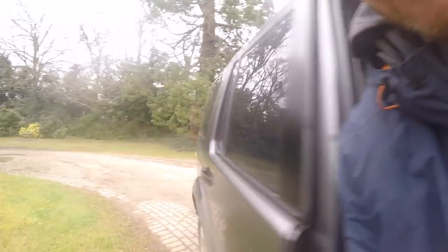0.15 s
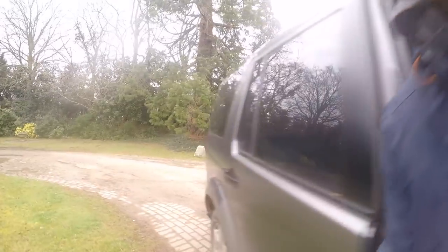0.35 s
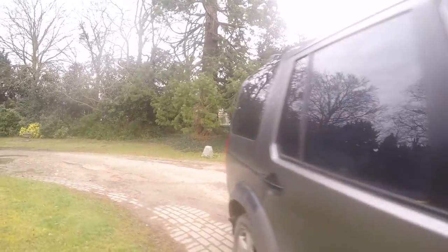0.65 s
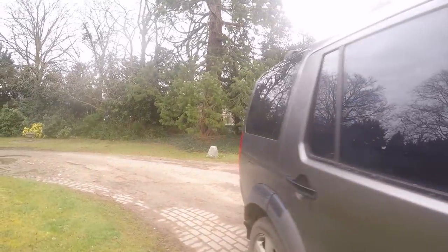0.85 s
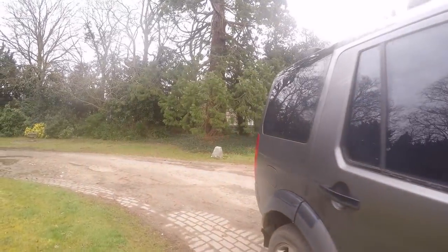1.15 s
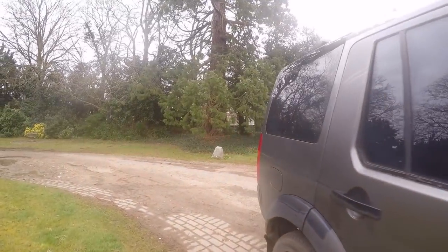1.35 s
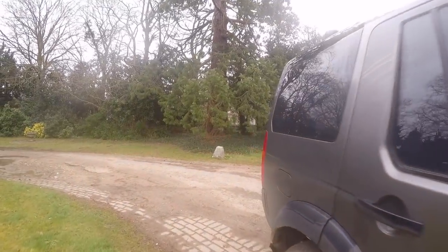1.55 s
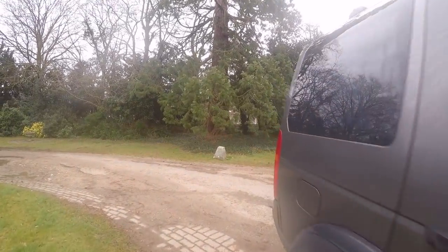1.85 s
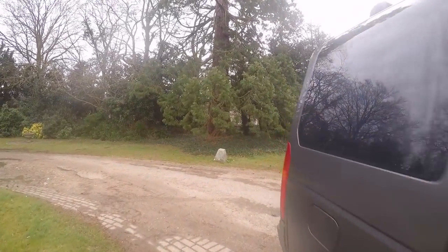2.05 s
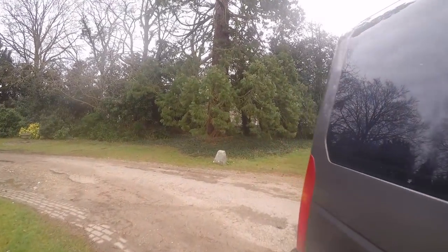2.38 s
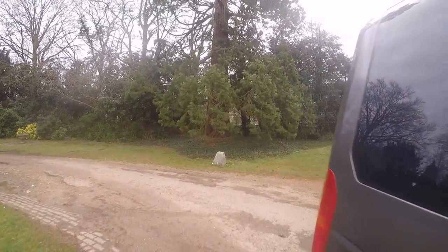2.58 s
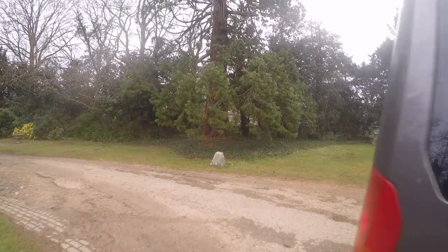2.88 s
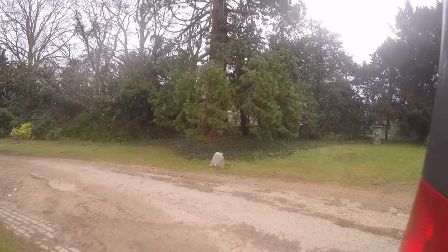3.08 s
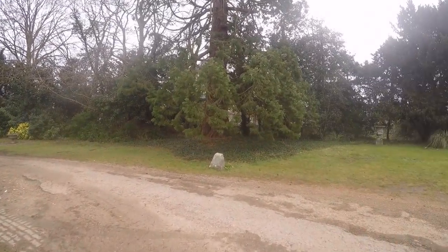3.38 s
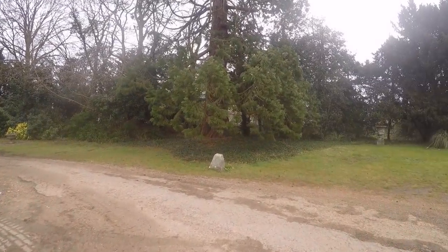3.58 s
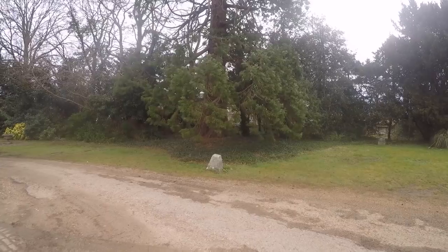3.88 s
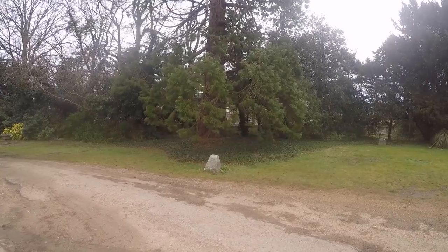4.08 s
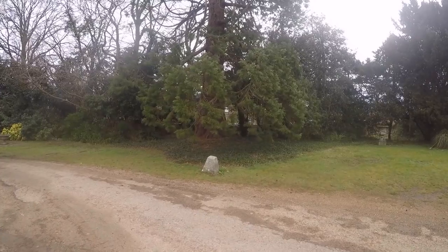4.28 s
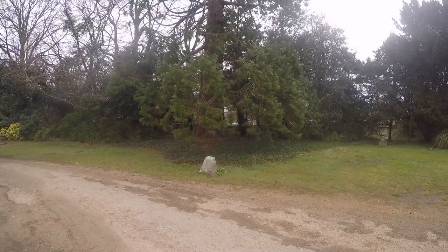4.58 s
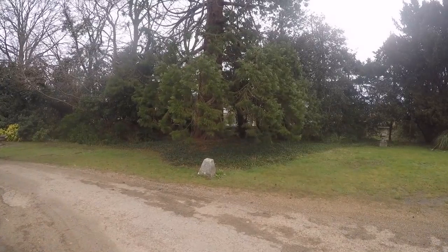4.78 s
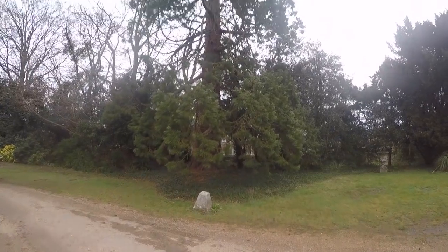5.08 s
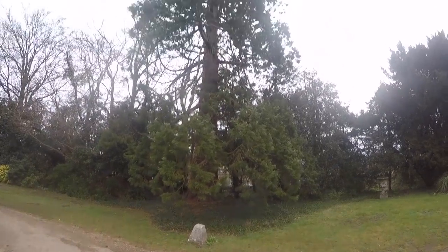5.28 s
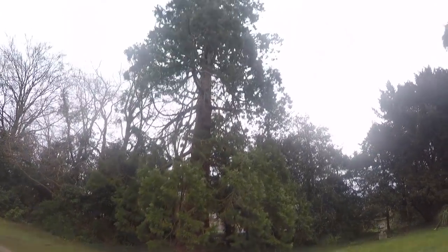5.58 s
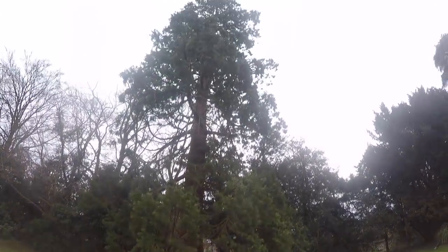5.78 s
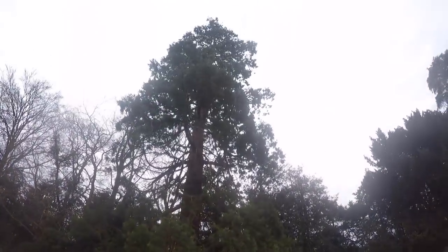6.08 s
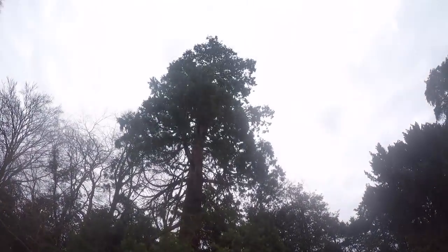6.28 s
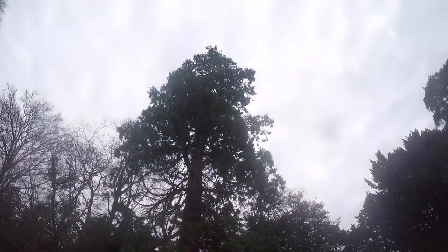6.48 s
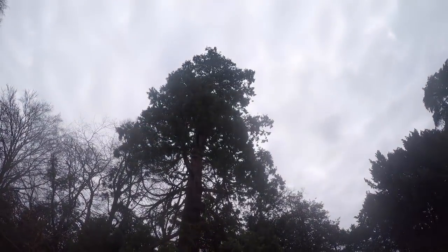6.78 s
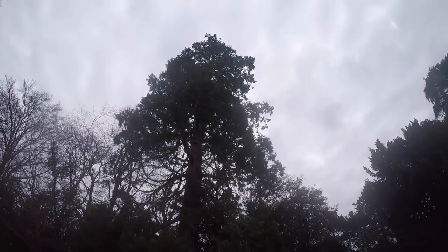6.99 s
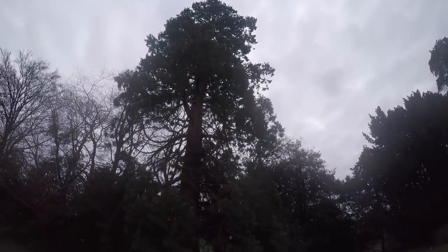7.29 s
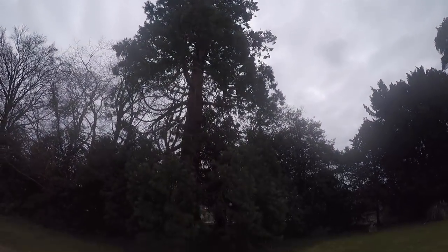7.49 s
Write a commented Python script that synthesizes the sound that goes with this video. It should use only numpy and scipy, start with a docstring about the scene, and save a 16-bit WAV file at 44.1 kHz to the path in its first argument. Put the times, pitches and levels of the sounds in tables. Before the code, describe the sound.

A single-channel outdoor scene beside a car among trees, with faint uneven low rumble and soft distant hiss throughout. From 0 to 0.7 s a jacket rustles close by in tiny catches, with dull handling bumps and light ticks; the rubbing fades until about 2.5 s. Thin bird whistles at 0.25-0.9 s lead into chips and buzzy trills until 1.5 s, blurred by the trees. At about 2.3 s a car door slams very close: a short boxy thud, crisp steel latch clacks and a quick fading rocking in the seal. The background then dips. A near bird makes two sharp falling calls at 3.1 and 3.35 s, the second louder, with a short echo. At 4.6 s comes a small hollow knock with a brief rattle. Distant birds whistle from 5.35 to 6.6 s, then chip and trill rapidly from 6.8 s to the end.

```python
"""A jacket rustles at first, as friction noise broken into tiny catches, amid ticks and soft bumps.
Whistles, chips and trills, frequency-modulated sines, come from trees that echo as decaying noise.
At 2.3 s a car door slams close by: damped modes, cabin noise and latch clacks; a near bird then calls.
A short hollow knock, a set of damped modes with a rattling tail, sounds at 4.6 s.
A faint outdoor rumble and hiss, two bands of filtered noise of uneven level, last throughout."""
import sys
import numpy as np
from scipy import signal
from scipy.fft import rfft, irfft
from scipy.io import wavfile

SR = 44100
rng = np.random.default_rng(int(sys.argv[2]) if len(sys.argv) > 2 else 0)


def inscribe(sig):
    """Save sig as 16-bit PCM at rate SR to the path in sys.argv[1].

    A 1-D sig is mono; a 2-D sig holds one channel per row.
    Samples are clipped to [-1, 1] before scaling.
    """
    pcm = np.round(np.clip(np.atleast_2d(sig).T, -1, 1) * 32767)
    wavfile.write(sys.argv[1], SR, pcm.astype(np.int16))


N = 337273
T = np.arange(N) / SR  # time axis, s

# door meeting seal, latch and frame: start_s, thud_level_db, latch_clack_level_db
DOOR_IMPACTS = [(2.2577, -42.5, -25.5), (2.264, -14.5, -25), (2.2719, -15.5, -23.5), (2.275, -16, -16.5),
                (2.282, -11.5, -29.5), (2.3011, -26.5, -27.5), (2.309, -14.5, -37)]
# resonances of door skin and cabin: pitch_hz, relative_level_db, t60_s
DOOR_RESONANCES = [(64.3, -11.5, 0.33), (98.3, -22, 0.43), (152.3, -12.5, 0.22), (193.2, -6, 0.28),
                   (221, -3, 0.22), (261.6, 2.5, 0.12), (288, -6, 0.15), (322.6, 1.5, 0.099),
                   (349, -9, 0.22), (387, -2.5, 0.15), (432, -21.5, 0.27), (594, -19, 0.08),
                   (686, -15, 0.086), (840, -20, .1)]
# spectrum of the steel latch: frequency_hz, relative_level_db
LATCH_SPECTRUM = [(320, -33), (550, -10), (727, 8), (1070, -21), (1380, -5.5), (2130, -7), (2350, -4),
                  (3190, -11), (3720, -10), (4850, -13.5), (5280, -7), (6330, -11.5), (9750, -20.5),
                  (15500, -49)]
# spectrum of the air in the cabin: frequency_hz, relative_level_db
CABIN_SPECTRUM = [(35, -12.5), (65, -11.5), (100, -4.5), (150, 3.5), (230, 3.5), (320, -4), (400, -9.5),
                  (470, -12.5), (560, -39), (700, -27), (1200, -49.5)]
# the clacks are brightest while the latch snaps shut
LATCH_S, LATCH_SPAN_S, LATCH_BRIGHT_HZ, SEAL_BRIGHT_HZ = 2.288, 0.014, 17740, 5500
# then the door rocks in its seal, weaker each time; the losses are per rebound
ROCK_S, ROCK_PERIOD_S = 2.327, 0.0172
ROCK_THUD_DB, ROCK_CLACK_DB, THUD_LOSS_DB, CLACK_LOSS_DB = -22.5, -37, 2, 9.5

KNOCK_S = 4.637
# resonances of the hollow knock: pitch_hz, level_db, t60_s, delay_s
KNOCK_RESONANCES = [(410, -34.5, 0.046, 0.0031), (754, -18.5, 0.025, 0.00036), (1484, -21.5, 0.027, .0035),
                    (1690, -24, 0.024, .0035), (2104, -26.5, 0.032, .005), (3180, -15.5, 0.0067, .003),
                    (4310, -32, 0.017, 0.0039)]
# spectrum of the knock's rattling aftersound: frequency_hz, relative_level_db
KNOCK_RATTLE_SPECTRUM = [(350, -25), (750, 6), (1100, -7), (1500, 7.5), (2150, -7), (2550, -32),
                         (3200, -16), (4400, -27), (5000, -38)]
# small sharp ticks: start_s, centre_hz, level_db, t60_s
SHARP_TICKS = [(.257, 865, -43, 0.033), (0.739, 1843, -41.5, 0.025), (0.742, 3600, -52, 0.013),
               (.818, 8900, -41.5, .015), (1.782, 3150, -51.5, 0.034), (2.018, 3600, -46, 0.057),
               (2.023, 2817, -47, 0.024), (3.862, 3000, -50.5, 0.071)]
# soft bumps of handling: start_s, level_db
HANDLING_BUMPS = [(0.012, -30), (.048, -26.5), (.268, -34), (0.403, -32.5), (0.433, -34)]

# falling calls of the nearest bird: start_s, high_part_s, low_part_s, start_hz, high_hz, jump_hz, low_hz,
# high_level_db, low_level_db, warble_decay_s, relative_echo_db
NEAR_CALLS = [(3.107, .025, .11, 5980, 5300, 30.5, 3276, -33, -39.5, 0.039, -4.5),
              (3.348, 0.032, 0.075, 5290, 5130, 653, 3453, -22.5, -35, 0.018, -10.5)]
# a call sags on its high note while it swells, then breaks, jumps down and warbles on to the low note
SWELL_DB, SWELL_S, BREAK_S, LOW_FADE_DB_PER_S = 17.5, 0.037, 0.0025, 51
JUMP_S, DROP_S, WARBLE_HZ, WARBLE_DEPTH_HZ = 0.0059, 0.025, 57, 520

# thin whistles in the trees: start_s, length_s, start_hz, end_hz, relative_level_db, nominal_quaver_depth_hz
TREE_WHISTLES = [(.252, 0.084, 3270, 3035, -44.5, 200), (0.394, 0.099, 3200, 2885, -47.5, 185),
                 (0.533, 0.035, 2970, 3040, -50, 185), (0.737, 0.16, 6344, 6100, -47.5, 120),
                 (.759, 0.139, 8350, 8280, -58.5, 160), (2.942, 0.043, 7710, 7820, -60.5, 40),
                 (5.346, 0.048, 3420, 3080, -60.5, 45), (5.394, 0.034, 3046, 3270, -49.5, 45),
                 (5.567, 0.055, 3750, 3870, -53.5, 45), (5.611, 0.0594, 4156, 4040, -40.5, 60),
                 (5.664, 0.14, 4163, 4253, -45, 148.6), (5.821, 0.26, 3648, 3530, -45.5, 45),
                 (6.297, .29, 8080, 8210, -54.5, 110), (6.578, .06, 8460, 8750, -66, 80)]
# quick chips: start_s, start_hz, end_hz, relative_level_db
BIRD_CHIPS = [(1.078, 3150, 2620, -55.5), (1.239, 4040, 2570, -47), (3.323, 5050, 6350, -46),
              (6.806, 4310, 3340, -48), (6.835, 3790, 4310, -41.5), (6.853, 2930, 3400, -51)]
CHIP_S = 0.014
# buzzy syllables of the trilling birds: start_s, start_hz, end_hz, relative_level_db
TRILL_SYLLABLES = [(0.884, 5900, 5700, -56.5), (.975, 5890, 6900, -48), (1.029, 6080, 5920, -42),
                   (1.194, 4960, 4040, -41), (1.262, 4270, 4390, -48.5), (1.405, 4370, 4130, -58),
                   (6.904, 4500, 4620, -45.5), (6.97, 5110, 5100, -47.5), (7.052, 4970, 4610, -48),
                   (7.159, 4500, 4500, -47.5), (7.261, 4270, 4120, -47.5), (7.359, 4470, 4114, -45.5),
                   (7.555, 3086, 3810, -45), (7.584, 3884, 4110, -40)]
# syllables are equally long, and the trill is wider the higher it is sung (nominal depths)
TRILL_S, TRILL_NARROW_HZ, TRILL_WIDE_HZ = 0.064, 110, 824
WIDEN_FROM_HZ, WIDEN_TO_HZ = 4100, 4910

# spectrum of rubbed cloth: frequency_hz, relative_level_db
CLOTH_SPECTRUM = [(410, -35.5), (700, -8), (940, -16.5), (1060, -29.5), (1780, -15), (2940, -12),
                  (6690, -8.5), (13500, -33), (15000, -30.5)]
# scrapes of the jacket: middle_s, half_length_s, level_db
JACKET_SCRAPES = [(0.26, 0.064, -54.5), (0.378, 0.039, -56), (0.68, 0.031, -76), (1.323, 0.092, -62.5),
                  (1.64, 0.045, -66.5), (2.188, 0.062, -72)]
# between scrapes the cloth keeps sliding, ever more softly, and stops as the door shuts
SLIDE_DB, SLIDE_FADE_DB_PER_S, SLIDE_END_S = -61.5, 4, 2.5
# a hollow scuff leads into the first scrape
SCUFF_S, SCUFF_HALF_S, SCUFF_HZ, SCUFF_DB = 0.24, 0.08, 1830, -53.5

# course of the outdoor background, before a fixed trim: time_s, hiss_level_db, rumble_level_db
BACKGROUND_LEVEL = [(0.0, -56, -46), (0.4, -58, -45), (0.68, -59, -49.5), (1.28, -58.5, -48.5),
                    (2.06, -64, -53), (2.32, -60, -50.5), (2.58, -70.5, -60.5), (2.85, -71.5, -63.5),
                    (3.17, -63.5, -54), (3.34, -58.5, -47.5), (3.51, -57.5, -46.5), (4.96, -66, -56.5),
                    (5.62, -62.5, -53.5), (5.88, -56, -49), (6.71, -62, -52.5), (7.2, -57.5, -50),
                    (7.65, -59.5, -51)]
# spectrum of the low rumble: frequency_hz, relative_level_db
RUMBLE_SPECTRUM = [(15, -37), (25, -9.5), (65, -0.5), (208, -4.5), (247, -8), (300, -9.5), (346, -15),
                   (410, -15), (443, -21.5), (498, -26), (560, -43), (730, -69), (1230, -120)]
# spectrum of the distant hiss: frequency_hz, relative_level_db
HISS_SPECTRUM = [(280, -43.5), (480, -4.5), (546, -18), (631, -8), (688, -5), (750, -1), (931, -2.5),
                 (1110, -10), (1210, -3), (1480, -3.5), (3310, -21.5), (6700, -21.5), (7960, -28),
                 (9190, -26.5), (15000, -47.5)]
TOP_HZ = 15300  # upper band limit of the whole sound


def door():
    """Impact excitation: each blow rings the panel through the rubber seal and clacks the steel latch."""
    panel = sum(ring(hz, db, t60) for hz, db, t60 in DOOR_RESONANCES)
    push = T[:SR] * np.exp(-T[:SR] / 0.0005)  # the seal softens the contact
    panel = signal.fftconvolve(panel, push / push.sum())[:SR]
    thuds, clacks = np.zeros(N), np.zeros(N)
    for s, thud_db, clack_db in DOOR_IMPACTS + rocking():
        # the air inside takes a moment to fill
        cabin = noise(CABIN_SPECTRUM, size=SR) * fade(0.25) * (1 - fade(0.008)) ** 2
        add(thuds, s, undb(thud_db) * (panel + undb(-8.5) * cabin))
        # a hard crack, then the lock parts jangle
        crack_and_jangle = fade(0.032) + undb(-19.5) * fade(0.14)
        clack = noise(LATCH_SPECTRUM, size=SR) * crack_and_jangle * (1 - fade(0.0016))
        snap = np.exp(-((s - LATCH_S) / LATCH_SPAN_S) ** 2)
        bright_hz = SEAL_BRIGHT_HZ + (LATCH_BRIGHT_HZ - SEAL_BRIGHT_HZ) * snap
        add(clacks, s, undb(clack_db) * cut(clack, bright_hz, "low", order=4))
    # a panel radiates little below its lowest mode
    slam = cut(thuds, 68, "high", order=3) + clacks
    echo = trees(thuds / 2 + 2 * clacks, t60=0.21, gap_s=0.04, patchy_db=3.5, treble_t60=0.6)
    return slam + undb(-39.5) * echo


def rocking(count=4):
    """Damped oscillation: evenly spaced, fading rebounds as rows of start_s, thud_db, clack_db."""
    return [(ROCK_S + k * ROCK_PERIOD_S, ROCK_THUD_DB - k * THUD_LOSS_DB, ROCK_CLACK_DB - k * CLACK_LOSS_DB)
            for k in range(count)]


def knocks():
    """Modal decay: a hollow knock and dull bumps ring as damped sines, ticks as narrow noise bursts."""
    out = np.zeros(N)
    for hz, db, t60, delay in KNOCK_RESONANCES:
        onset = 1 - np.exp(-(T[:SR] / 0.0019) ** 2)
        add(out, KNOCK_S + delay, ring(hz, db, t60) * onset)
    rattle = noise(KNOCK_RATTLE_SPECTRUM, size=SR) * fade(0.17) * (1 - fade(0.015))
    add(out, KNOCK_S, undb(-36) * rattle)
    for s, hz, db, t60 in SHARP_TICKS:
        tick = noise([(hz * 0.89, -20), (hz, 0), (hz * 1.16, -20)], size=SR)
        add(out, s, undb(db) * tick * fade(t60) * (1 - fade(0.0033)))
    for s, db in HANDLING_BUMPS:
        bump = ring(121.7, db, 0.19) + ring(181.5, db - 3.0, 0.2)
        add(out, s, bump * (1 - fade(0.0035)))
    return out


def near_bird():
    """Frequency modulation: a whistle swells high, breaks and warbles down; trees hold each pitch briefly."""
    out = np.zeros(N)
    for (s, high_s, low_s, start_hz, high_hz, jump_hz, low_hz,
         high_db, low_db, warble_s, echo_db) in NEAR_CALLS:
        t = T[:int((high_s + low_s) * SR)]
        fall = np.maximum(t - high_s, 0)  # time since the break
        sag = (start_hz - high_hz) * np.maximum(1 - t / high_s, 0)
        jump = jump_hz * np.exp(-(fall / JUMP_S) ** 2)
        drop = (high_hz - jump_hz - low_hz) * np.exp(-fall / DROP_S)
        warble = WARBLE_DEPTH_HZ * np.sin(2 * np.pi * WARBLE_HZ * fall) * np.exp(-fall / warble_s)
        pitch = low_hz + sag + jump + drop - warble
        db = low_db + (high_db - low_db) * np.exp(-fall / BREAK_S) - LOW_FADE_DB_PER_S * fall
        db = db - SWELL_DB * np.maximum(1 - t / SWELL_S, 0) ** 2
        edge = np.minimum(np.minimum(t, t[-1] - t) / 0.0026, 1)
        song = np.zeros(N)
        add(song, s, edge * undb(db) * tone(pitch))
        echo = trees(song, t60=0.58, gap_s=0.006, patchy_db=4.5, treble_t60=0.3)
        out += song + undb(echo_db) * echo
    return out


def far_birds():
    """Modulation and scattering: gliding whistles, chips and buzzy trills are blurred by the trees."""
    song = np.zeros(N)
    for s, length, start_hz, end_hz, db, depth in TREE_WHISTLES:
        add(song, s, note(np.linspace(start_hz, end_hz, int(length * SR)), db, depth))
    for s, start_hz, end_hz, db in BIRD_CHIPS:
        add(song, s, note(np.linspace(start_hz, end_hz, int(CHIP_S * SR)), db, 0))
    for s, start_hz, end_hz, db in TRILL_SYLLABLES:
        pitch = np.linspace(start_hz, end_hz, int(TRILL_S * SR))
        depth = np.interp(pitch.mean(), [WIDEN_FROM_HZ, WIDEN_TO_HZ], [TRILL_NARROW_HZ, TRILL_WIDE_HZ])
        add(song, s, note(pitch, db, depth))
    # twigs round the perch blur each note; the wood behind adds a longer tail
    blur = trees(song, t60=0.16, gap_s=0.0031, patchy_db=5)
    tail = trees(song, t60=0.36, gap_s=0.031, patchy_db=10.5)
    return undb(-2.5) * song + undb(-6.5) * blur + undb(-5) * tail


def jacket(grain_db=2.5, scrape_db=2.6, edges_hz=(2500, 4500, 7500)):
    """Stick-slip friction: cloth slides in tiny catches, and folds of different size catch apart."""
    def catches():
        """Irregular sticking: a fast and a slower random level of rms 1."""
        return unit(undb(grain_db * walk(350) + scrape_db * walk(70)))

    rest, rub = noise(CLOTH_SPECTRUM), 0
    for hz in edges_hz:
        # filtering forwards and backwards leaves no phase shift, so the bands subtract cleanly
        band = cut(cut(rest, hz, "low")[::-1], hz, "low")[::-1]
        rub = rub + band * catches()
        rest = rest - band
    rub = rub + rest * catches()
    slide = undb(SLIDE_DB - SLIDE_FADE_DB_PER_S * T) * np.clip((SLIDE_END_S - T) / 0.1, 0, 1)
    scrapes = sum(swell(*scrape) for scrape in JACKET_SCRAPES)
    scuff = noise([(SCUFF_HZ * 0.79, -14), (SCUFF_HZ, 0), (SCUFF_HZ * 1.18, -14)])
    scuff = scuff * undb(grain_db * walk(117.5))
    return rub * (slide + scrapes) + scuff * swell(SCUFF_S, SCUFF_HALF_S, SCUFF_DB)


def outdoors(rumble_db=2.0, hiss_db=0.5):
    """Filtered noise: rumble and hiss drop quickly after the door and rise again around the near bird's calls."""
    s, hiss_level, rumble_level = np.transpose(BACKGROUND_LEVEL)
    rumble_gain = undb(rumble_db + np.interp(T, s, rumble_level) + 0.56 * walk(11))
    hiss_gain = undb(hiss_db + np.interp(T, s, hiss_level) + 0.2 * walk(5))
    return noise(RUMBLE_SPECTRUM) * rumble_gain + noise(HISS_SPECTRUM) * hiss_gain


def trees(x, t60, gap_s, patchy_db, treble_t60=0.29):
    """Diffuse scattering: trunks and branches echo unevenly; the treble may be given a shorter decay."""
    build_up = 1 - np.exp(-T[:SR] / gap_s)
    scatter = rng.standard_normal(SR) * undb(patchy_db * walk(150, size=SR)) * build_up
    low = cut(scatter, 6000, "low") * fade(t60)
    high = cut(scatter, 6000, "high") * fade(min(t60, treble_t60))
    echo = low - high  # the minus sign keeps the bands in phase at the crossover
    return signal.fftconvolve(x, echo / np.linalg.norm(echo))[:N]


def note(pitch, db, depth, trill_hz=190, waver=0.0038, edge_s=0.0026):
    """Frequency modulation: one note along a pitch curve, with a quick uneven trill on top."""
    n = len(pitch)
    trill = tone(trill_hz * undb(4 * walk(250, size=n)))
    uneven_depth = depth * undb(1.7 * walk(146, size=n) - 2.0)
    hz = pitch * (1 + waver * walk(196.0, size=n)) + uneven_depth * trill
    edge = np.minimum(np.minimum(T[:n], T[n - 1] - T[:n]) / edge_s, 1)
    flutter_db = 5.7 * depth / (abs(depth) + 130)  # wide trills flutter in strength, pure notes hold steady
    return np.sin(np.pi / 2 * edge) * undb(db + flutter_db * walk(111.5, size=n)) * tone(hz)


def ring(hz, db, t60):
    """Free vibration: one struck mode as a decaying sine."""
    return undb(db) * np.sin(2 * np.pi * hz * T[:SR]) * fade(t60)


def tone(hz):
    """Phase as the integral of frequency: a sine that follows a pitch curve."""
    return np.sin(2 * np.pi * np.cumsum(hz) / SR)


def noise(spectrum, size=N):
    """Spectral shaping: noise of rms 1 coloured by points of frequency_hz, relative_level_db."""
    hz, db = np.transpose(spectrum)
    f = np.maximum(np.fft.rfftfreq(size, 1 / SR), 1)
    gain = undb(np.interp(np.log(f), np.log(hz), db))
    # beyond the outer points the spectrum rolls off
    gain = gain * np.minimum(f / hz[0], 1) ** 3 * np.minimum(hz[-1] / f, 1) ** 6
    return unit(irfft(rfft(rng.standard_normal(size)) * gain, size))


def walk(rate, size=N):
    """Random modulation: straight lines join normal random values drawn rate times a second."""
    return np.interp(T[:size] * rate, np.arange(4000), rng.standard_normal(4000))


def swell(s, half_s, db):
    """Gaussian envelope: a smooth rise and fall of gain around time s."""
    return undb(db) * np.exp(-((T - s) / half_s) ** 2)


def fade(t60):
    """Exponential decay: one second of gain that falls 60 dB in every t60 seconds."""
    return np.exp(-np.log(1000) * T[:SR] / t60)


def cut(x, hz, kind, order=2):
    """Butterworth filtering: a low-pass or high-pass."""
    sos = signal.butter(order, min(hz, 0.45 * SR), kind, fs=SR, output="sos")
    return signal.sosfilt(sos, x)


def undb(db):
    """Logarithmic level: decibels to amplitude gain."""
    return 10 ** (np.asarray(db) / 20)


def unit(x):
    """Effective value: scale to rms 1."""
    return x / np.sqrt(np.mean(x ** 2))


def add(out, s, x):
    """Superposition: mix x into out from time s on."""
    i = max(int(s * SR), 0)
    out[i:i + len(x)] += x[:N - i]


def scene():
    """Superposition: all sources sum at one listening point, as one channel."""
    return (door() + knocks() + near_bird() + far_birds() + jacket() + outdoors())[None]


def record(dry):
    """Band limiting: a steep elliptic low-pass removes the extreme treble."""
    return signal.sosfilt(signal.ellip(10, 0.2, 70, TOP_HZ, fs=SR, output="sos"), dry)


dry = scene()
out = record(dry)
inscribe(out)
```